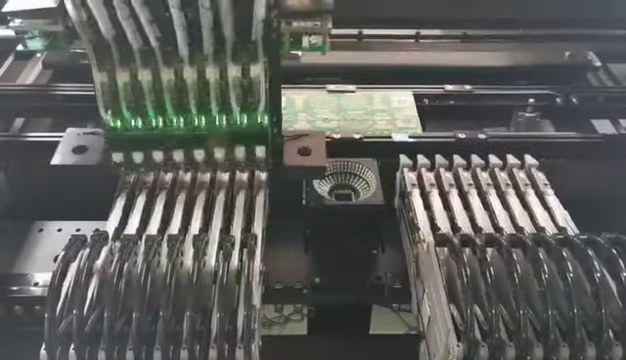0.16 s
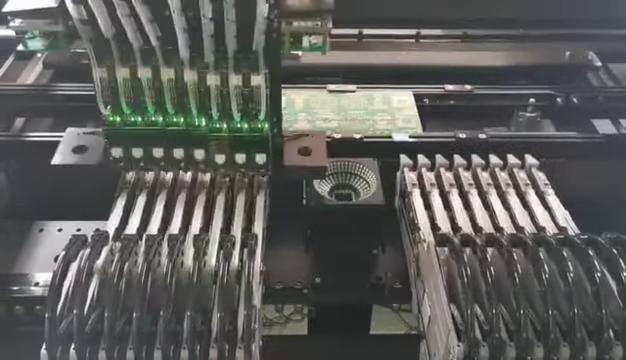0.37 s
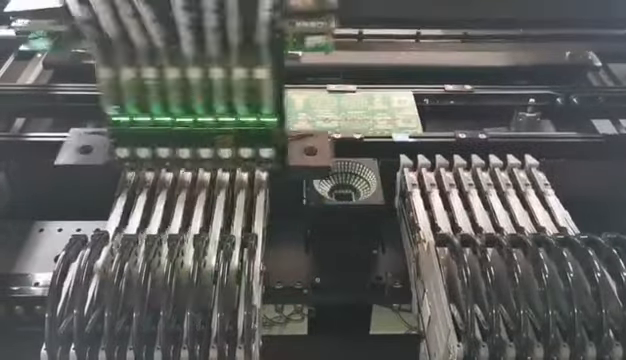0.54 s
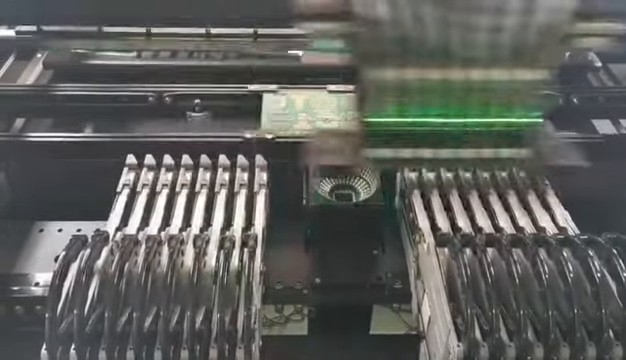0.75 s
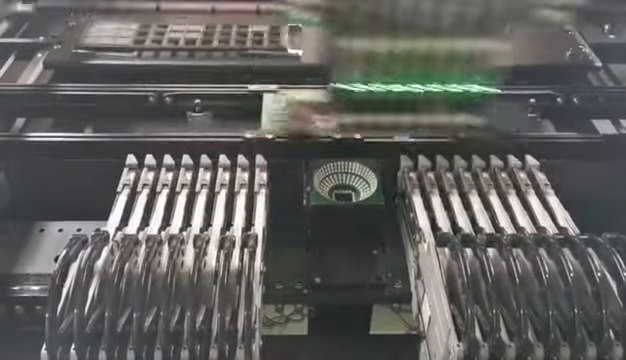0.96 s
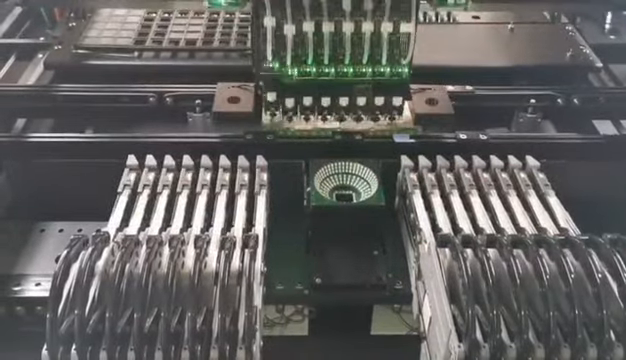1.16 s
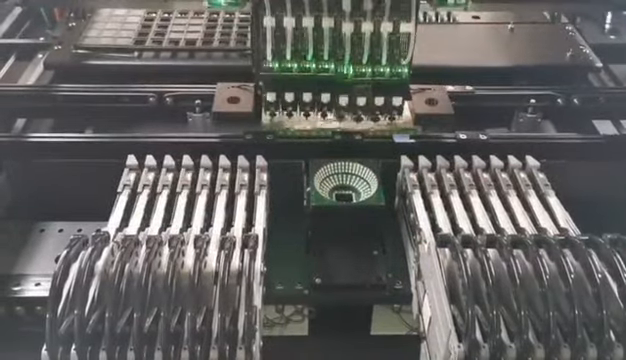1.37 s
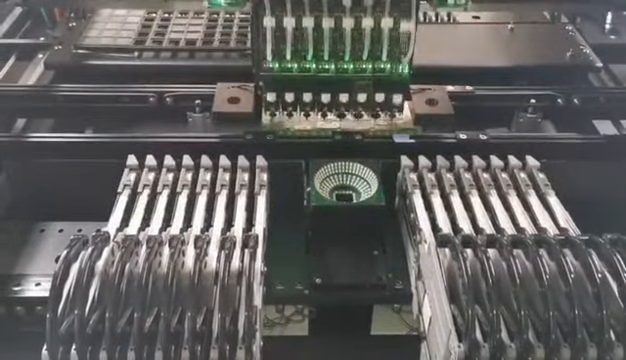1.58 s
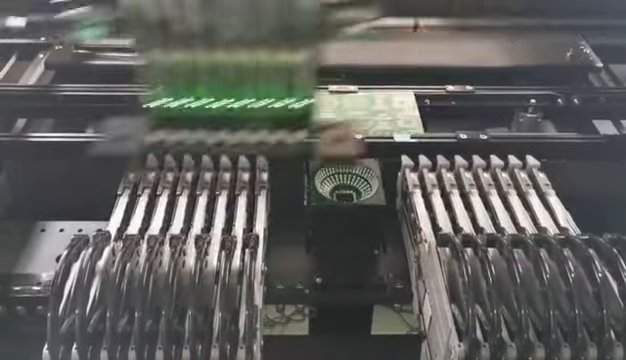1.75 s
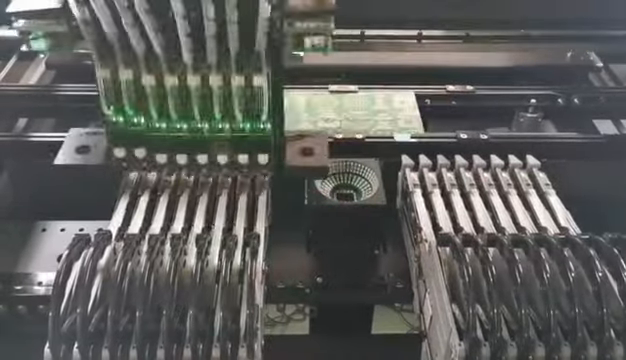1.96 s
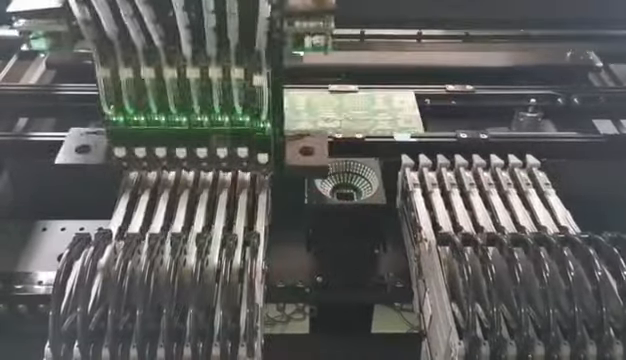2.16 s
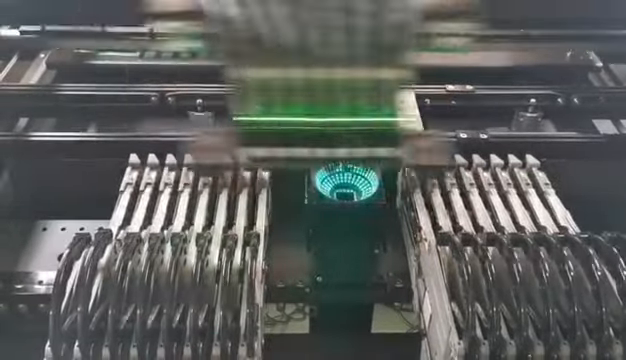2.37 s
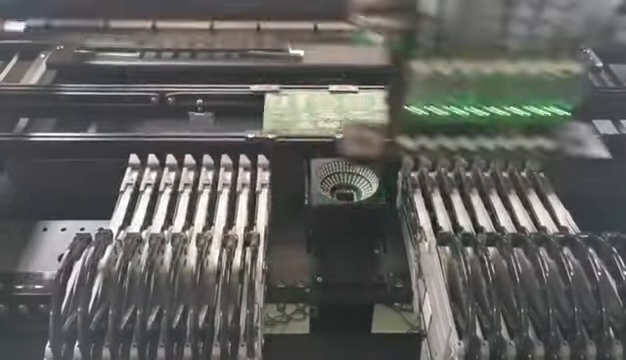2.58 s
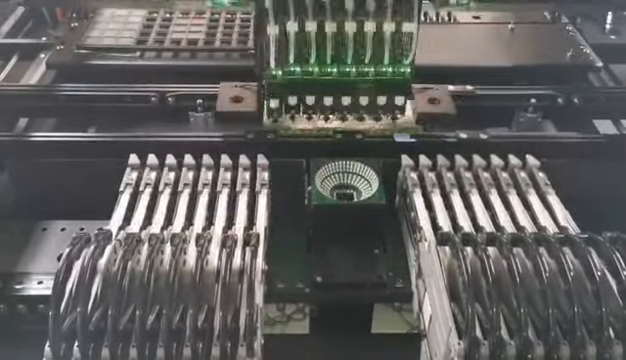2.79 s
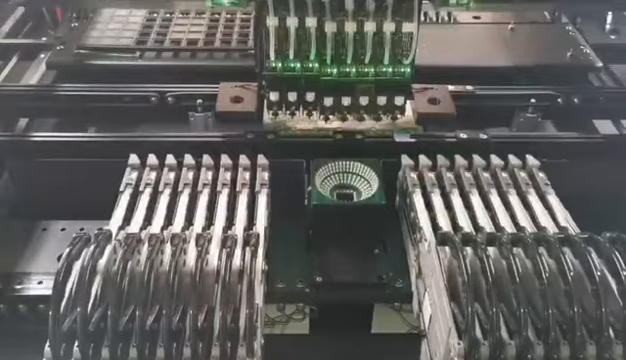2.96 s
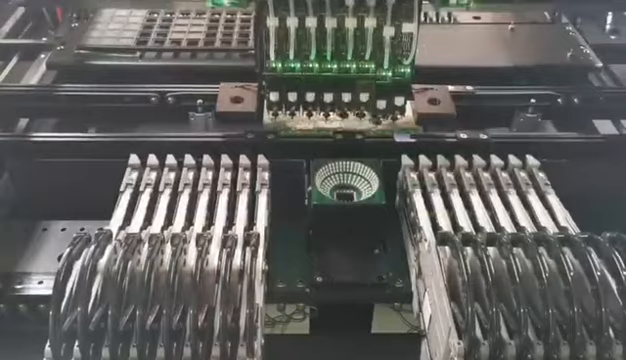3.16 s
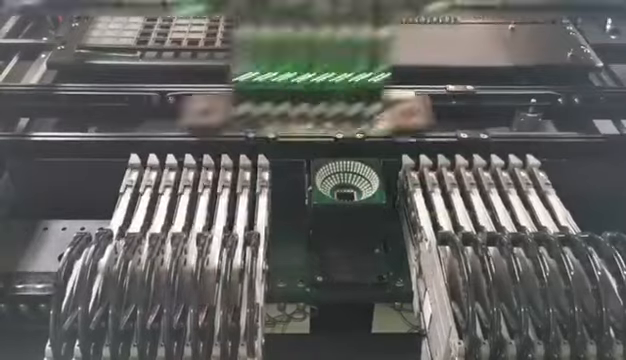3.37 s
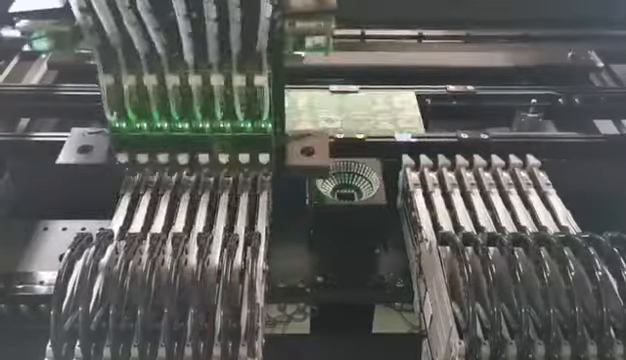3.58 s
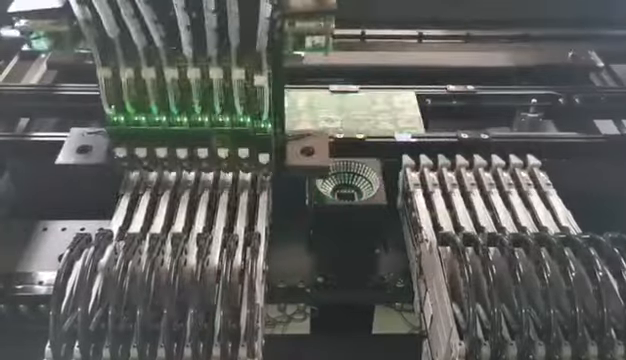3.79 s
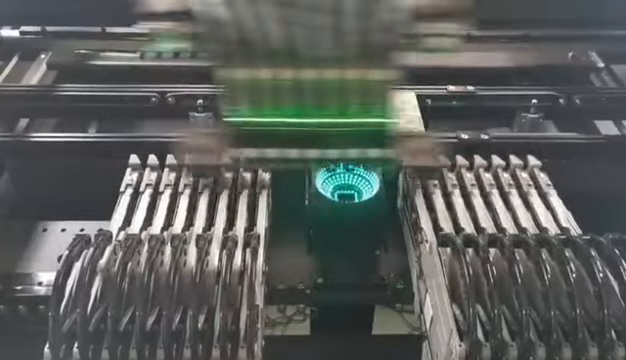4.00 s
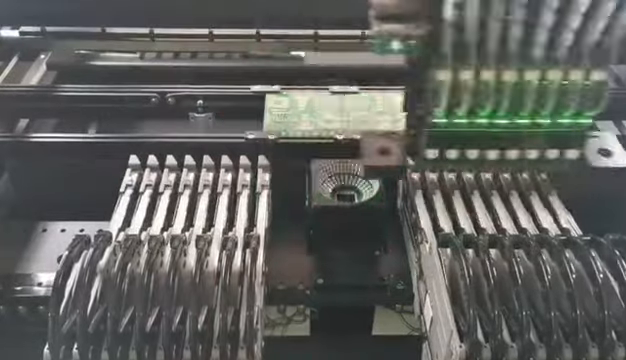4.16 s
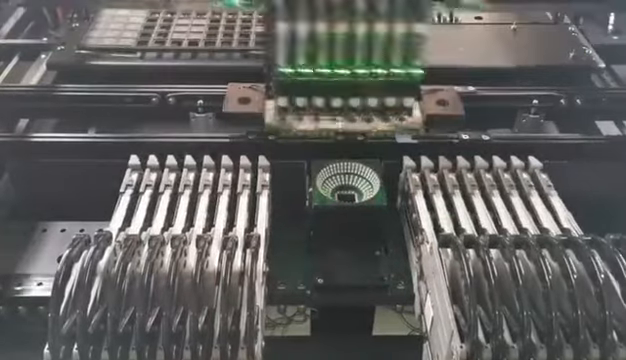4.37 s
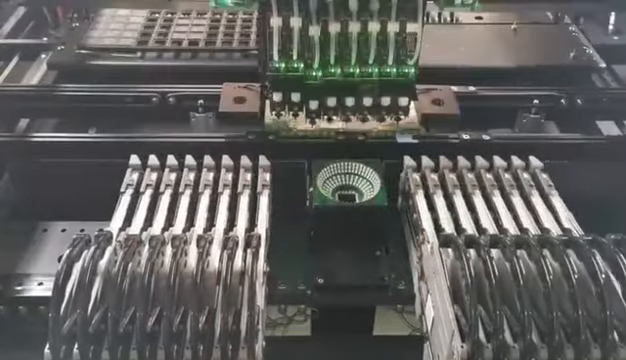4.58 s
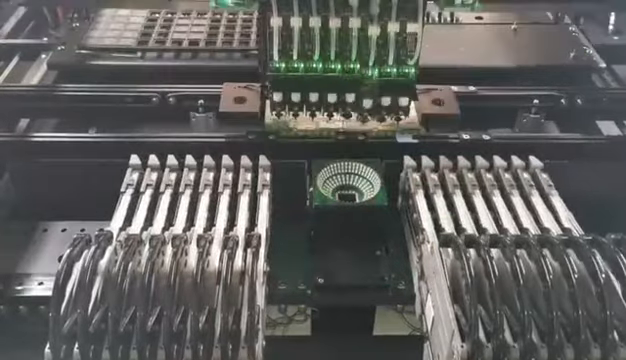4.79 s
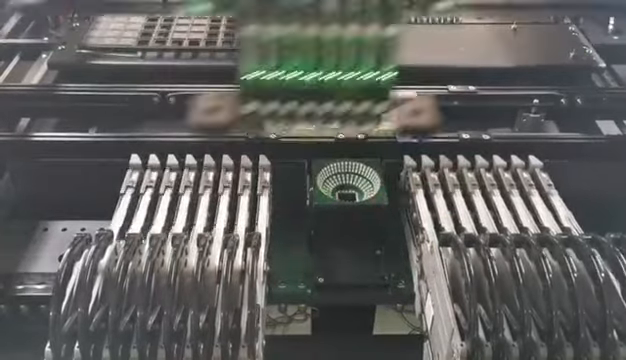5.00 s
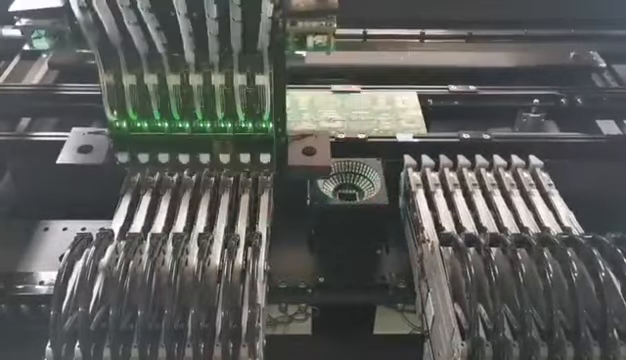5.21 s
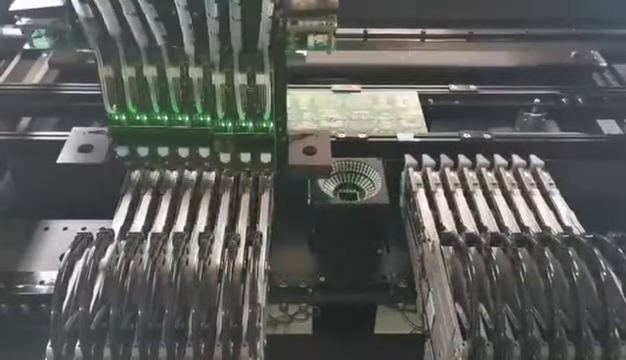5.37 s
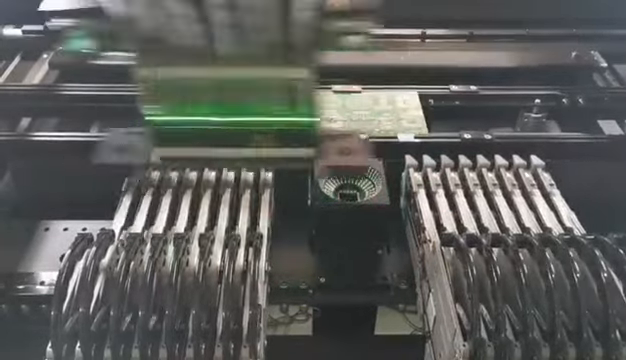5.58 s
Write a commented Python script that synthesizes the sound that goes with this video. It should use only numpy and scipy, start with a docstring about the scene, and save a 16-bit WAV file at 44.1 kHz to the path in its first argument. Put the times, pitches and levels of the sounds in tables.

```python
"""Pick-and-place machine at work

Valves release short blasts of air, and nozzles tap parts down in a row: shaped noise and ringing tones.
Vacuum hisses at the nozzles and rushes in the hoses: coloured noise that follows each work cycle.
Feeders clunk, and the travelling gantry shakes rails, frame and base: ringing tones and low noise.
High ticks and a fan and pump hum join in. A small two-port microphone hears it; its right port
favours much of the treble.
"""
import sys
import numpy as np
from scipy import signal
from scipy.fft import rfft, irfft, next_fast_len
from scipy.io import wavfile

SR = 44100
rng = np.random.default_rng(int(sys.argv[2]) if len(sys.argv) > 2 else 0)


def store_pcm(level_fs):
    """Save levels as 16-bit WAV."""
    pcm = np.round(np.clip(level_fs, -1, 1) * 32767).astype(np.int16)
    wavfile.write(sys.argv[1], SR, np.atleast_2d(pcm).T)


def voltage_ratio(level):
    """Linear amplitude factor for a level in decibels (scalar or array-like)."""
    return 10 ** (np.asarray(level, float) / 20)


N = 248724   # length in samples

# Valve blasts. Each row: time in seconds, nominal treble peak in dB, body level in dB,
# length from the opening in seconds, left minus right in dB.
BLASTS = [(0.019, -30.5, -47.5, 0.018, 4), (0.102, -20.5, -37.5, 0.035, -0.5), (0.299, -31, -46, 0.02, 0),
          (0.325, -28, -52.5, 0.0089, -9), (0.364, -20, -55, 0.018, 3), (0.655, -23, -43.5, 0.018, -0.5),
          (0.692, -24.5, -36.5, 0.028, -2.5), (1.7625, -16, -33, 0.02, 6.5),
          (1.958, -28, -45.5, 0.039, 3.5), (2.014, -27, -57, 0.033, 6), (2.3436, -22, -44.5, 0.04, -0.5),
          (2.388, -23, -34.5, 0.016, 3), (3.421, -21.5, -35.5, 0.029, -1), (3.631, -30.5, -48, 0.025, 0),
          (3.683, -24, -52.5, 0.02, 6.5), (3.992, -13.5, -44, 0.013, 5.5), (4.023, -27.5, -36.5, 0.021, -1),
          (5.0604, -20.5, -36, 0.025, 0.5), (5.269, -30, -39.5, 0.017, -3.5), (5.323, -28.5, -49, 0.02, 8),
          (5.607, -20.5, -49.5, 0.064, 4)]
# Valve plungers snapping over. Each row: time in seconds, nominal peak in dB.
SNAPS = [(0.106, -19), (1.7649, -17), (3.1025, -27.5), (3.4236, -23), (5.062, -31), (5.2685, -24),
         (5.2824, -22.5)]
SNAP_RISE_S, SNAP_TAIL_S, SNAP_CREST_DB = 0.00068, 0.0016, 7
# Nozzles setting parts down. Each row: time in seconds, nominal puff peak in dB, knock level in dB,
# left minus right of the puff in dB.
TAPS = [(1.4295, -27.5, -45.5, 1), (1.4894, -32, -53, 12), (1.5548, -25, -41, -3), (1.6201, -35, -46, -13),
        (1.686, -33.5, -39, -7), (3.0394, -34, -53, -2), (3.1027, -27.5, -51, 1), (3.1694, -31.5, -54, -2),
        (3.229, -29, -40, 10), (3.2853, -33.5, -40, -12), (3.3437, -27.5, -45.5, -1), (4.742, -28, -46, 2),
        (4.7994, -32, -52, 9), (4.8664, -34.5, -38.5, 22), (4.9221, -29.5, -38.5, 2),
        (4.991, -26, -34.5, -1.5)]
# Brief high ticks, some together with air blasts. Each row: time in seconds, level in dB.
TICKS = [(0.3244, -31), (0.376, -18), (1.7617, -46.5), (2.0158, -41), (3.424, -24), (3.6733, -35),
         (5.0615, -43), (5.269, -38), (5.3208, -21)]
# Feeder clunks. Each row: time in seconds, level in dB.
CLUNKS = [(0.654, -32), (2.341, -31.5), (3.982, -31), (5.606, -30.5)]
# The thud beside a clunk: level against the clunk, hold and tail.
THUD_DB, THUD_HOLD_S, THUD_TAIL_S = -17, 0.026, 0.031
CREST_DB = 10   # how far the peaks of a jet are taken to stand above its mean level

# Ring of a tapped nozzle holder. Each row: pitch in Hz, level against the blow in dB,
# time to fade by 60 dB in seconds.
HOLDER_RING = [(633, -7.5, .07), (771, -5, 0.083), (1050, -3, 0.053), (1090, -5.5, 0.099),
               (1970, -13, 0.045), (2480, -2.5, .05), (2900, -3.5, 0.023)]
# Tones of a high tick. Each row: pitch in Hz, level against the tick in dB, 60 dB fade in seconds.
TICK_TONES = [(7950, -2, .02), (8200, 0, .02), (8450, -6, .015)]
# Ring of a feeder lever. Each row: pitch in Hz, level against the blow in dB, 60 dB fade in seconds.
LEVER_RING = [(329, -11, 0.12), (407, -18.5, 0.17), (494, -9, 0.14), (643, -12.5, 0.1), (786, -9.5, 0.13),
              (880, -9, 0.078)]

# Colour of the bright hiss at a nozzle. Each row: frequency in Hz, relative level in dB per Hz.
HISS = [(2350, -44), (4000, -13.5), (4820, -6), (5370, -6), (5860, 2), (6560, 3.5), (6990, 2), (7290, 2.5),
        (7500, -5.5), (9750, -13.5), (16500, -120)]
# Colour of the air in the hoses. Each row: frequency in Hz, relative level in dB per Hz.
HOSE = [(1060, -44), (1800, -6), (2440, -0.5), (2750, -5.5), (3210, -4), (3720, -7.5), (5600, 0),
        (7280, -23.5), (12300, -120)]
# Colour of the fuller part of a blast. Each row: frequency in Hz, relative level in dB per Hz.
BLAST_BODY = [(880, -39), (1500, -11), (2480, -3.5), (2800, -5), (3560, -7), (5130, -3), (5600, 2),
              (7280, -19.5), (12300, -120)]
# Colour of the loose feeder parts. Each row: frequency in Hz, relative level in dB per Hz.
THUD = [(150, -29), (300, -3.5), (500, 0), (900, -3), (1300, -28.5), (2500, -90)]
# Colour of the frame's rumble. Each row: frequency in Hz, relative level in dB per Hz.
RUMBLE = [(76, -27), (130, -7), (205, 0.5), (326, 1), (496, -4.5), (609, -4), (713, -4), (1200, -13),
          (1560, -40), (2640, -120)]
# Colour of the rolling on the rails. Each row: frequency in Hz, relative level in dB per Hz.
RAIL = [(470, -36.5), (800, -5.5), (1080, -4.5), (1420, -1.5), (1740, -5.5), (2600, -7.5), (3380, -35),
        (5720, -120)]
# Colour of the shaking base. Each row: frequency in Hz, relative level in dB per Hz.
BASE = [(12, -50), (20, 0), (38, -7), (75, 7), (113, 0.5), (151, -0.5), (180, -21), (230, -38), (400, -120)]
# Colour of the droning cross beam. Each row: frequency in Hz, relative level in dB per Hz.
BEAM = [(150, -40), (230, -3), (310, 1), (400, -5), (620, -14), (1000, -60)]
BEAM_DB = -3   # against the frame rumble of a crossing

# Cavities that released air rings in. Each row: centre in Hz, width in Hz, added gain in dB.
VALVE_CAVITIES = [(2850, 150, -16), (3010, 380, -4), (3756, 440, 4), (4850, 440, -24)]
# Frame resonances set off by travel. Each row: centre in Hz, width in Hz, added gain in dB.
FRAME_RINGS = [(192, 27, -1.5), (332, 44, -8), (617, 66, -1.5), (780, 54, 0)]
# Rail resonances. Each row: centre in Hz, width in Hz, added gain in dB.
RAIL_RINGS = [(1140, 55, -7), (1379, 31, -11), (2200, 27, -1.5)]
NOISE_CUTOFF_HZ = 7584   # steep low-pass on the noise layers, taps and snaps

# A cycle opens as the emptied head lets go of its vacuum. Each entry: start in seconds.
CYCLES = [-1.55, .1036, 1.7638, 3.426, 5.062]
# Vacuum through one cycle: it bleeds off, returns at the pick, sags as parts leave, shuts.
# Each row: seconds into the cycle, nozzle hiss in dB before the dip of the shut vacuum.
VACUUM = [(0, -46.5), (.05, -40), (.17, -47), (.24, -47), (.29, -38), (.85, -38), (1.25, -39.5),
          (1.55, -43)]
# The vacuum closes just before each release: lead, time fully shut, dip, and ramp on either side.
SHUT_LEAD_S, SHUT_S, SHUT_DB, SHUT_EDGE_S = 0.036, 0.037, -5, 0.017
RAIL_DIP_SHARE = 0.43   # share of the vacuum dip also applied to the rail noise
# Steady leak; then the hoses refill, with levels against blast body and tap puff.
HOSE_DB, BLEED_DB, BLEED_TAIL_S, TAP_BLEED_DB = -54.5, -11.5, 0.075, -28

# Runs down to the feeders. Each row: time of full force in seconds, hold in seconds,
# frame rumble in dB, extra rail and hose rush in dB.
APPROACHES = [(.22, 0.12, -46.5, 0.5), (1.89, .15, -49, 0), (3.55, .14, -47, 3), (5.19, 0.12, -45.5, -4)]
# Braking over the feeders. Each row: time of full force in seconds, hold in seconds,
# frame rumble in dB, extra rail and hose rush in dB.
STOPS = [(.32, 0.027, -48, 0), (1.985, 0.016, -44, 0.19), (3.645, 0.013, -44.5, 1),
         (5.25, 0.054, -45.5, -1)]
# Loaded head pulling away. Each row: time of full force in seconds, hold in seconds,
# frame rumble in dB, extra rail and hose rush in dB.
DEPARTURES = [(.7, .03, -57, 0.87), (2.39, 0.028, -57, 1), (4.02, 0.022, -61.5, -2.7)]
# Crossing to the board. Each row: time of full force in seconds, hold in seconds,
# frame rumble in dB, extra rail and hose rush in dB.
CROSSINGS = [(.945, 0.18, -57.5, 7), (2.61, 0.18, -46, 1.5), (4.43, 0.074, -57, -1)]
# Short steps from pad to pad. Each row: time of full force in seconds, hold in seconds,
# frame rumble in dB, extra rail and hose rush in dB.
STEPS = [(.03, 0.074, -51.5, 0.85), (1.6, 0.21, -54, 0), (3.24, 0.22, -52, 0.078), (4.88, 0.21, -57, 0.44)]
# What each kind of move shakes. Each holds: rail rush, base shudder and hose shake,
# all in dB against the frame rumble.
APPROACH = (-4, -4.5, -10)
STOP = (-5.5, 3.8, -13.5)
DEPARTURE = (0.62, -1, 3)
CROSSING = (-1.5, -10.5, -6.5)
STEP = (-1, 3.5, 0)
# How each kind of move builds and dies: rise and tail in seconds.
APPROACH_S, STOP_S, DEPARTURE_S = (.06, .04), (.05, .04), (.03, .22)
CROSSING_S, STEP_S = (.02, .11), (.15, .07)
# Levels at rest. It holds: frame, rail and base in dB.
IDLE_DB = (-56, -60.5, -56.5)
WANDER_DB = 1.0   # unevenness of the rolling

# Fan and pump tones. Each row: pitch in Hz, level in dB rms before wavering.
HUM = [(67, -74.5), (106, -61.5), (211, -68.5)]
# How alike the two ports hear noise. Each row: frequency in Hz, likeness from 0 to 1.
LIKENESS = [(40, .9), (90, .96), (180, .9), (350, .84), (700, .63), (1500, .04), (8000, 0)]
# Colour difference of the ports. Each row: frequency in Hz, left minus right in dB.
PORTS = [(60, -0.5), (200, -1.5), (550, 3), (1400, 2), (2300, 3.5), (3500, -0.5), (4700, -1.5),
         (5500, -9.5), (7500, -14), (8100, 2.5)]
CUTOFF_HZ = 9430


def at_hz(points, hz):
    """Reads a spectrum table on a log-frequency axis."""
    table = np.array(points)
    return np.interp(np.log(hz), np.log(table[:, 0]), table[:, 1])


def rms_one(x):
    """Scales a sound to unit power."""
    return x / np.sqrt(np.mean(x ** 2) + 1e-20)


def drift(rate_hz):
    """Slow random wandering of spread 1: smoothed noise on every 20th sample, then joined up."""
    r = np.exp(-40 * np.pi * rate_hz / SR)
    slow = signal.lfilter([1], [1, -2 * r, r * r], rng.standard_normal(N // 20 + 2002))
    slow = slow[2000:]   # leave out the filter's start
    return np.interp(np.arange(N) / 20, np.arange(len(slow)), rms_one(slow - slow.mean()))


def noise(spectrum, flicker_db, flicker_hz, peaks=()):
    """Coloured stereo noise, alike in the bass and unrelated in the treble, flickering in level."""
    size = next_fast_len(N)
    hz = np.maximum(np.arange(size // 2 + 1) * SR / size, 1)
    gain = voltage_ratio(at_hz(spectrum, hz))
    for centre_hz, width_hz, peak_db in peaks:
        gain = gain * (1 + voltage_ratio(peak_db) / (1 + (2 * (hz - centre_hz) / width_hz) ** 2))
    alike = np.clip(at_hz(LIKENESS, hz), 0, 1)
    mid, side = rfft(rng.standard_normal((2, size)))
    both = np.sqrt(1 + alike) * mid + np.sqrt(1 - alike) * side * [[1], [-1]]
    steady = irfft(both * gain, size)[:, :N]
    return rms_one(steady * voltage_ratio(flicker_db * drift(flicker_hz)))


def bursts(times, levels_db, lengths, pans_db, rise_s, tail_s):
    """Stereo envelope: each push builds up to its time, holds, then dies away."""
    out = np.zeros((2, N))
    for s, level_db, length, pan_db in zip(times, levels_db, lengths, pans_db):
        start = max(round((s - rise_s) * SR), -SR)
        first = max(start, 0)
        t = np.arange(max(-start, 0), min(SR, N - start)) / SR
        rise = np.clip(t / rise_s, 0, 1) ** 2
        fall = np.exp(-np.maximum(t - length, 0) / tail_s)
        sides = voltage_ratio(level_db + pan_db / 2 * np.array([[1], [-1]]))
        out[:, first:first + len(t)] += rise * fall * sides
    return out


def strike(times, levels_db, modes, smear_s):
    """Ringing tones, each set off by three ever weaker pushes at moments of its own."""
    out = np.zeros((2, N))
    for hz, mode_db, t60 in modes:
        force = np.full((2, N + SR), 1e-18)
        chances = rng.random((len(times), 3, 2))
        unlike = 1 - np.clip(at_hz(LIKENESS, hz), 0, 1)
        for s, level_db, contacts in zip(times, levels_db, chances):
            for order, (jitter, lag) in enumerate(contacts):
                at = s + (order + jitter) * smear_s
                size = voltage_ratio(level_db + mode_db - 8 * order)
                force[0, round(at * SR)] += size
                # the right port hears it up to a cycle later
                force[1, round((at + unlike * lag / hz) * SR)] += size
        r = voltage_ratio(-60 / (max(t60, .01) * SR))   # fading per sample
        w = 2 * np.pi * hz / SR
        out += signal.lfilter([0, np.sin(w)], [1, -2 * r * np.cos(w), r * r], force[:, :N])
    return out


def mottled(x, depth_db):
    """Random uneven gain over pitch and time cells, for a coarser-grained noise."""
    cells = signal.stft(x, nperseg=1024)[2]
    _, rows, columns = cells.shape
    patches = rng.standard_normal((2, rows // 3 + 1, columns // 4 + 1))
    field = patches.repeat(3, axis=1).repeat(4, axis=2)[:, :rows, :columns]
    field[:, :20] = field[0, :20] / 2   # the bass is steadier and alike in both ports
    return signal.istft(cells * voltage_ratio(depth_db * field), nperseg=1024)[1][:, :N]


def blasts():
    """Turbulent jets from the valves: a spitting treble, and a fuller body that builds a little later."""
    s, treble_db, body_db, length, pan_db = np.transpose(BLASTS)
    treble = bursts(s, treble_db - CREST_DB, length, pan_db, 0.0056, 0.015)
    treble = treble * noise(HISS, 3.4, 150)
    body = bursts(s + 0.011, body_db, length, pan_db, 0.014, 0.015)
    body = body * noise(BLAST_BODY, 0.34, 110, VALVE_CAVITIES)
    return treble + body


def snaps():
    """Valve plungers snap over: bright cracks of noise a few milliseconds long."""
    s, peak_db = np.transpose(SNAPS)
    level_db, length = peak_db - SNAP_CREST_DB, 0 * s + 2 * SNAP_RISE_S
    return bursts(s, level_db, length, 0 * s, SNAP_RISE_S, SNAP_TAIL_S) * noise(HISS, 0.6, 100)


def taps():
    """Each part is set down with a blow-off puff of air and a knock that rings the nozzle holder."""
    s, puff_db, knock_db, pan_db = np.transpose(TAPS)
    puff = bursts(s, puff_db - CREST_DB, np.full(len(s), .016), pan_db, 0.003, 0.016)
    air = rms_one(noise(BLAST_BODY, 0.93, 100, VALVE_CAVITIES) + voltage_ratio(3.0) * noise(HISS, 3.1, 150))
    return puff * air + strike(s, knock_db, HOLDER_RING, 0.0072)


def ticks():
    """Brief high ticks near 8 kHz, some together with air blasts: quickly fading tones."""
    s, level_db = np.transpose(TICKS)
    return strike(s, level_db, TICK_TONES, .004)


def clunks():
    """Feeder levers ring as they hit their stops, and loose parts thud along with them."""
    s, level_db = np.transpose(CLUNKS)
    thud = bursts(s + 0.0043, level_db + THUD_DB, 0 * s + THUD_HOLD_S, 0 * s, .004, THUD_TAIL_S)
    thud = thud * noise(THUD, 3.4, 80)
    return strike(s, level_db, LEVER_RING, .006) + thud


def shutoff():
    """Dip in dB while the vacuum is closed, with a straight ramp on either side."""
    t = np.arange(N) / SR
    dip_db = np.zeros(N)
    for release_s in CYCLES:
        shut = release_s - SHUT_LEAD_S
        inside = np.minimum(t - shut, shut + SHUT_S - t)
        dip_db += SHUT_DB * np.clip(inside / SHUT_EDGE_S + 1, 0, 1)
    return dip_db


def suction(shake):
    """Air drawn through nozzles and hoses makes a turbulent rush, sinking while the vacuum is shut."""
    curve = [(start + s, db) for start in CYCLES for s, db in VACUUM]
    curve_s, curve_db = np.transpose(curve)
    nozzle_db = np.interp(np.arange(N) / SR, curve_s, curve_db)
    shut_db = shutoff()
    s, _, body_db, length, _ = np.transpose(BLASTS)
    tap_s, puff_db, _, _ = np.transpose(TAPS)
    refill = bursts(s, body_db + BLEED_DB, length, 0 * s, 0.0067, BLEED_TAIL_S)
    refill = refill + bursts(tap_s, puff_db + TAP_BLEED_DB, 0 * tap_s, 0 * tap_s, 0.025, BLEED_TAIL_S)
    nozzles = voltage_ratio(nozzle_db + shut_db) * noise(HISS, 0.36, 51)
    hose_gain = (voltage_ratio(HOSE_DB) + refill + shake) * voltage_ratio(0.96 * shut_db)
    return nozzles + hose_gain * noise(HOSE, 1.0, 26, VALVE_CAVITIES)


def travel():
    """Gains of frame, rail, base and hose as the gantry moves; unrelated moves add in power."""
    power = np.zeros((4, 2, N))
    kinds = ((APPROACHES, APPROACH_S, APPROACH), (STOPS, STOP_S, STOP),
             (DEPARTURES, DEPARTURE_S, DEPARTURE), (CROSSINGS, CROSSING_S, CROSSING),
             (STEPS, STEP_S, STEP))
    for moves, (rise_s, tail_s), (rail_db, base_db, hose_db) in kinds:
        s, hold, level_db, rush_db = np.transpose(moves)
        length = rise_s + np.maximum(hold, 0)
        shares_db = (0, rail_db + rush_db, base_db, hose_db + rush_db)
        for part, share_db in enumerate(shares_db):
            power[part] += bursts(s, level_db + share_db, length, 0 * s, rise_s, tail_s) ** 2
    return np.sqrt(power)


def gantry(rumble, rush, shudder):
    """Bearings roll unevenly along the rails and shake frame and base."""
    idle_frame, idle_rail, idle_base = voltage_ratio(np.array(IDLE_DB))
    uneven = voltage_ratio(WANDER_DB * drift(8))
    frame = np.hypot(idle_frame, rumble * uneven) * noise(RUMBLE, 0.42, 25, FRAME_RINGS)
    rail_gain = np.hypot(idle_rail, rush * uneven) * voltage_ratio(RAIL_DIP_SHARE * shutoff())
    rail = rail_gain * noise(RAIL, 1, 27, RAIL_RINGS)
    base = np.hypot(idle_base, shudder) * noise(BASE, 0.98, 12.0)
    return frame + rail + base


def beam():
    """The cross beam drones, as low noise, while the head runs along it."""
    s, hold, level_db, _ = np.transpose(CROSSINGS)
    rise_s, tail_s = CROSSING_S
    length = rise_s + np.maximum(hold, 0)
    return bursts(s, level_db + BEAM_DB, length, 0 * s, rise_s, tail_s) * noise(BEAM, 3.0, 13)


def hum():
    """Fan and pump tones: sine waves that waver in level and slightly in pitch."""
    t = np.arange(N) / SR
    out = np.zeros(N)
    for hz, level_db in HUM:
        level = np.sqrt(2) * voltage_ratio(level_db + 0.73 * drift(0.96))
        out += level * np.sin(2 * np.pi * hz * t + 1.4 * drift(4.4))
    return out


def scene():
    """All sources together: a steep low-pass on noise layers, taps and snaps, then the rest is added."""
    *body, shake = travel()
    rush = mottled(suction(shake) + blasts() + gantry(*body), depth_db=3.0)
    low_pass = signal.ellip(14, .5, 70, NOISE_CUTOFF_HZ, fs=SR, output="sos")
    filtered = signal.sosfilt(low_pass, rush + taps() + snaps())
    return filtered + ticks() + beam() + clunks() + hum()


def top_cut(x):
    """Nothing passes above the cut-off."""
    return signal.sosfilt(signal.butter(12, 8800, fs=SR, output="sos"), x)


def record(dry):
    """The microphone's two ports differ in colour; the top is cut."""
    size = next_fast_len(N)
    hz = np.maximum(np.arange(size // 2 + 1) * SR / size, 1)
    tilt_db = at_hz(PORTS, hz) / 2
    even = np.sqrt(2 / (voltage_ratio(2 * tilt_db) + voltage_ratio(-2 * tilt_db)))   # the two gains keep their total power
    ports = irfft(rfft(dry, size) * voltage_ratio(tilt_db * [[1], [-1]]) * even, size)[:, :N]
    low_pass = signal.cheby2(12, 70, CUTOFF_HZ, fs=SR, output="sos")
    cut = signal.sosfilt(low_pass, ports)
    return top_cut(cut)


dry = scene()
out = record(dry)
store_pcm(out)
```